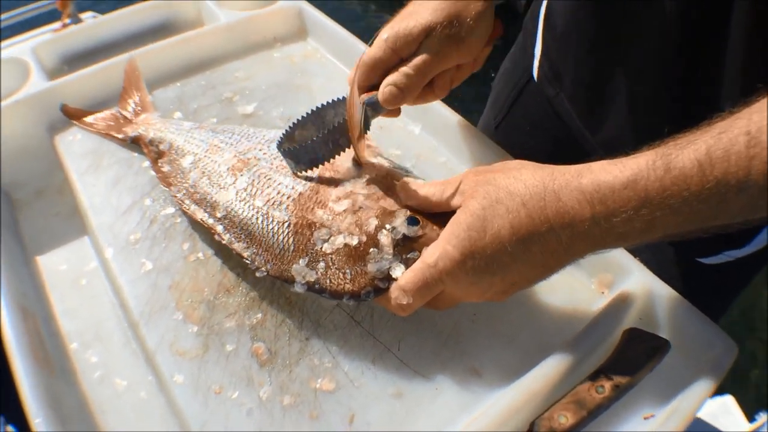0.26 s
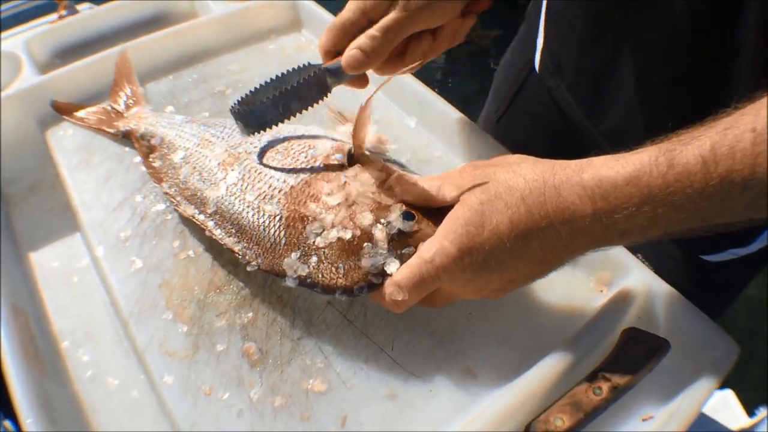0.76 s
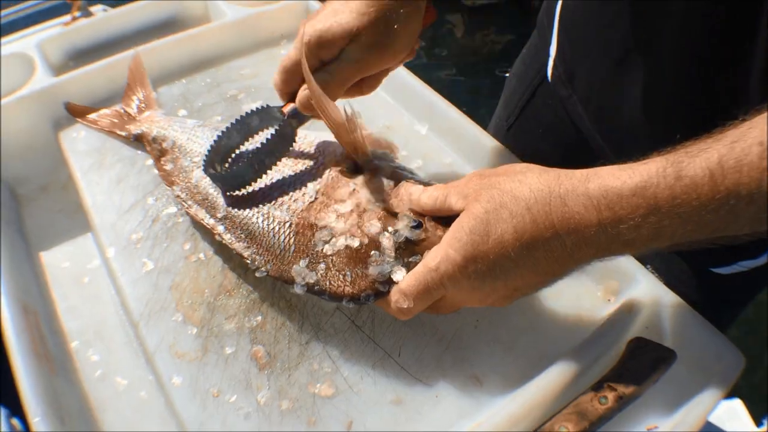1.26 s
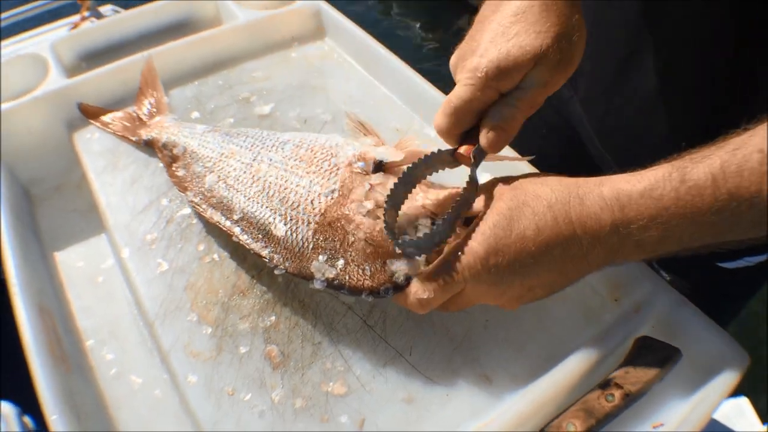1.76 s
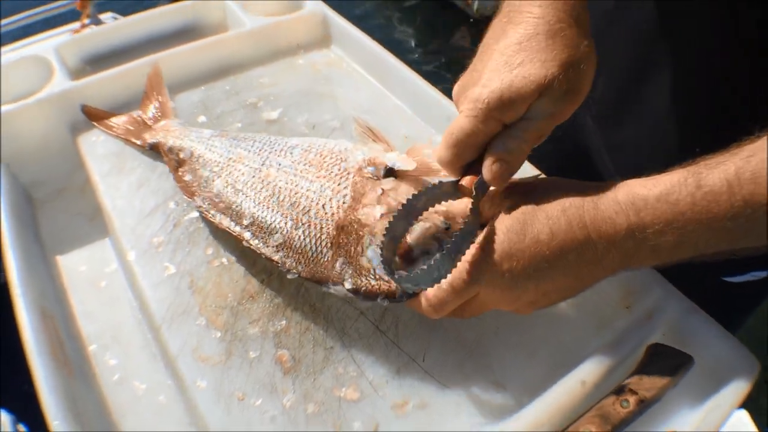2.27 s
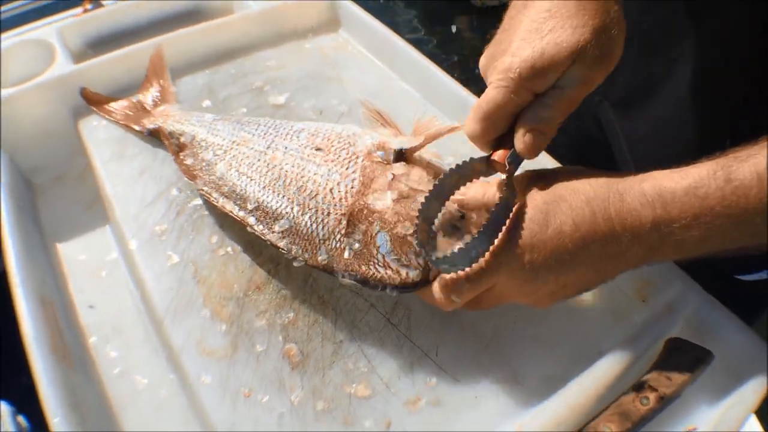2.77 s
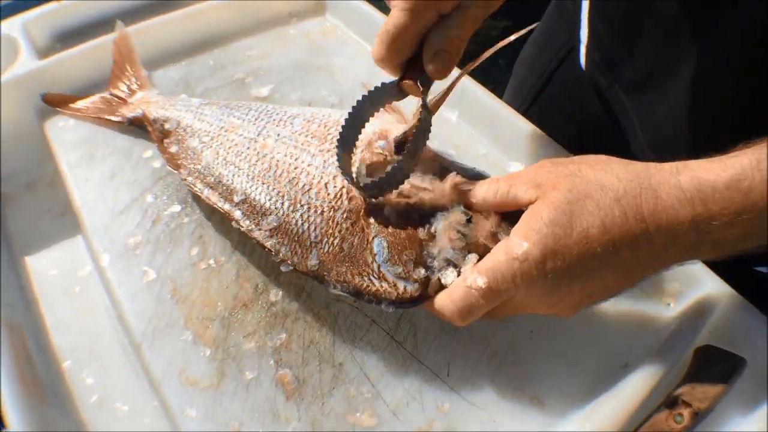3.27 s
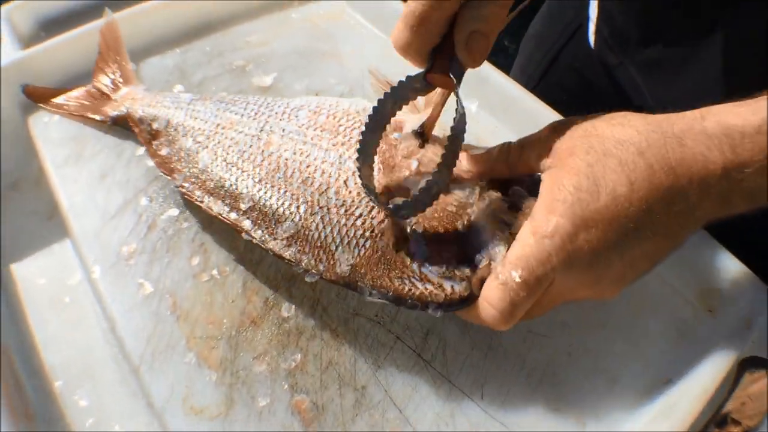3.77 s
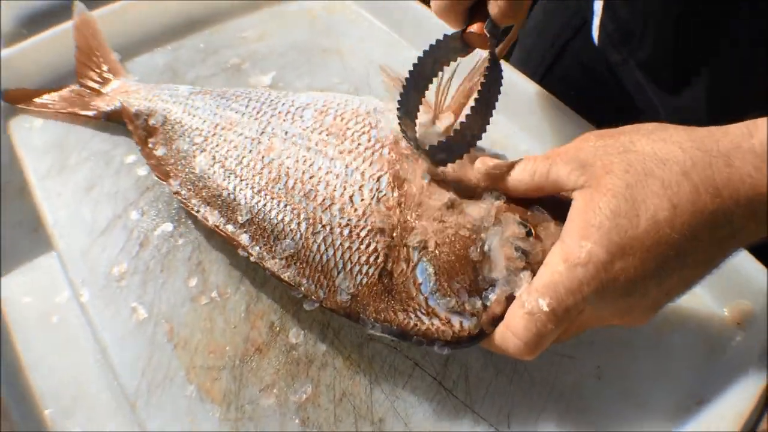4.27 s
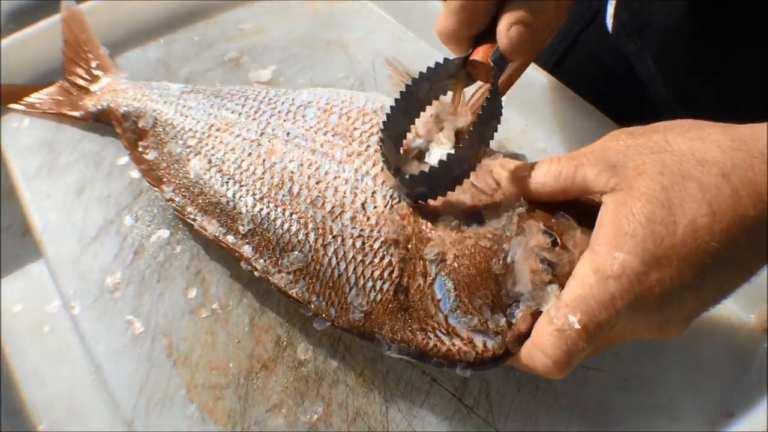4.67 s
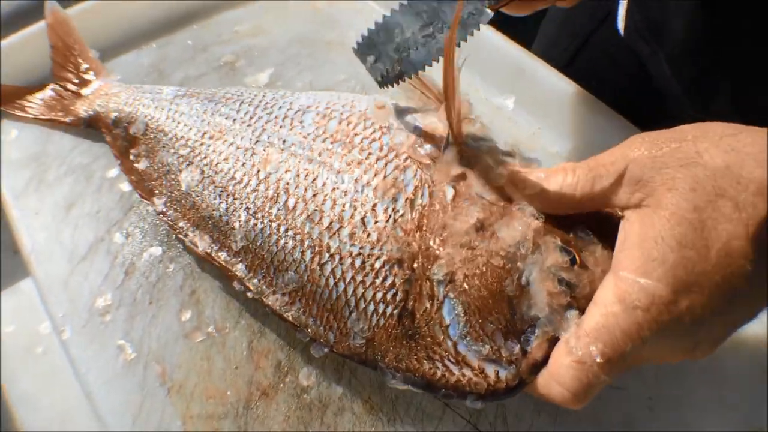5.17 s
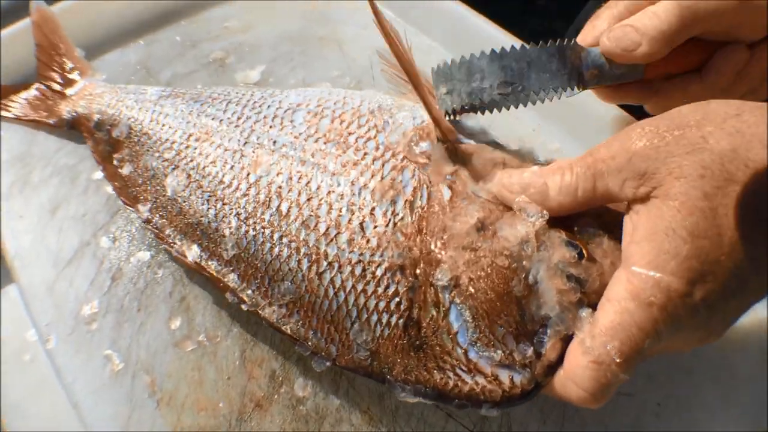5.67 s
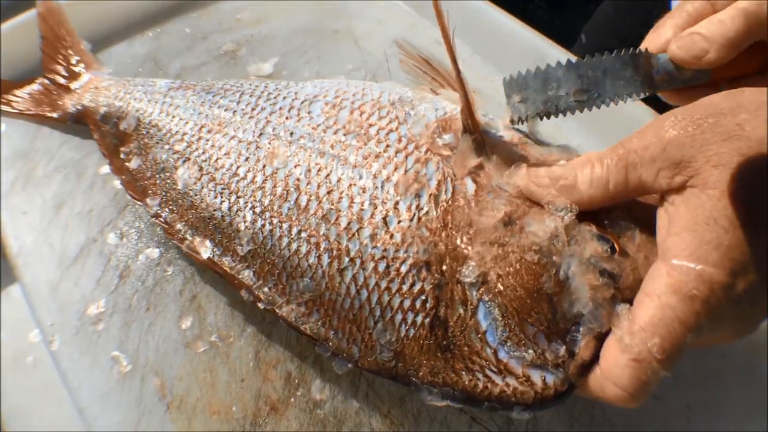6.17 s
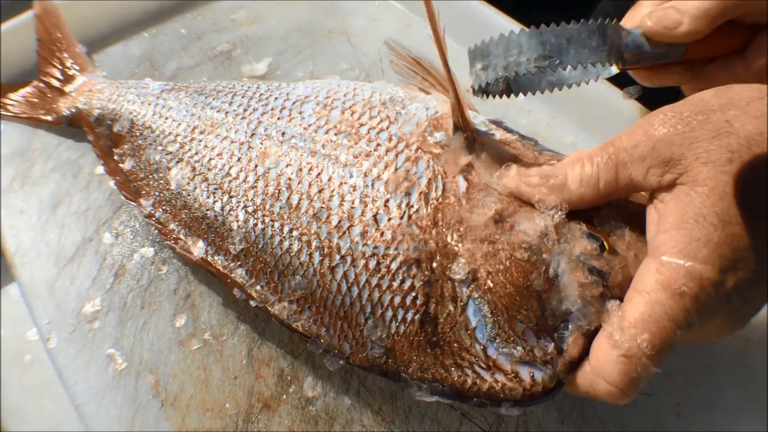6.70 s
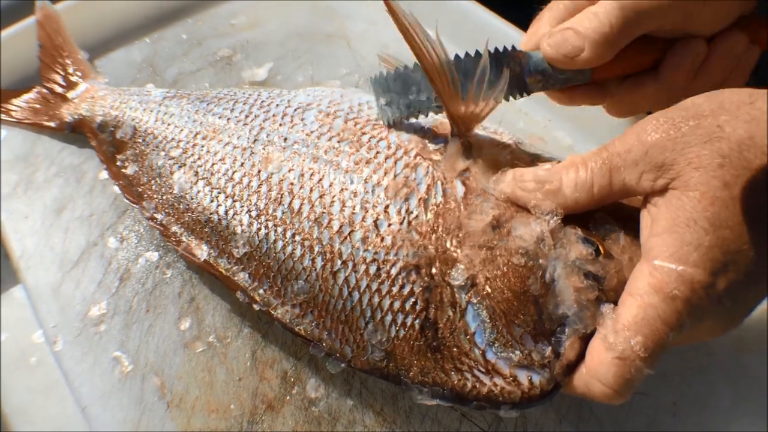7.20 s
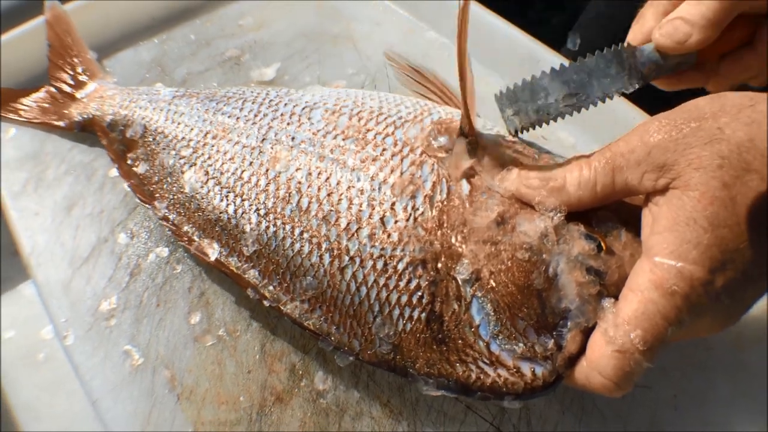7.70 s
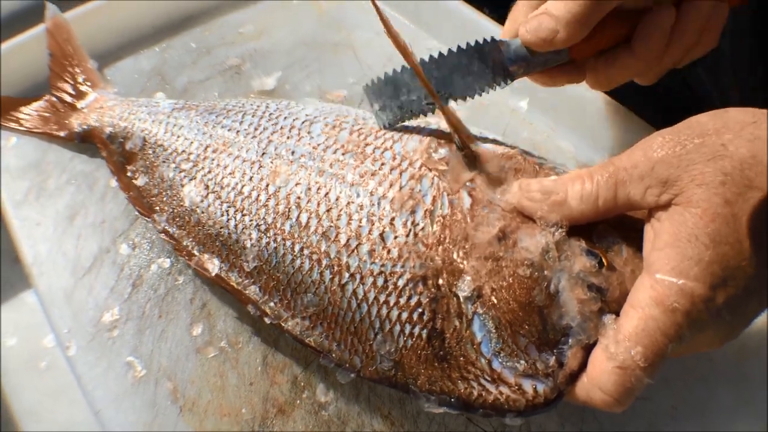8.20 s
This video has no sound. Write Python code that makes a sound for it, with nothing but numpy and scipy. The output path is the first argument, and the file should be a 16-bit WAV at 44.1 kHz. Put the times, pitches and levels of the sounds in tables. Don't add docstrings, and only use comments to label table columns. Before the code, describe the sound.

A close, dry outdoor sound of a fish being scaled with a toothed steel loop on a plastic tray. In the first second, separate short scrapes and sharp snaps fall near 0.1, 0.4, 0.6 and 1.0 s, with small tray knocks. From 1.4 to 3 s the strokes come steadily, about four a second, with strong bright cracks near 1.4, 2.0 and 2.5 s, a thin metallic hum on some strokes and tiny squeaks near 1.25 and 2.6 s. From 3.2 to 5.1 s the rasps are softer and grittier, scattered with pops and ticks. After a lighter gap, crisp crackling strokes resume at 5.5 s, roughly every 0.3 s, fullest around 5.8 to 6.4 s. From 7.2 s to the end at about 8.4 s, scrapes ring more hollow and the tray booms under heavier shoves. Faint, gently swelling open air continues throughout.

```python
import sys
import numpy as np
from scipy import signal
from scipy.fft import rfft, irfft
from scipy.io import wavfile
from scipy.ndimage import uniform_filter1d

SR = 44100
rng = np.random.default_rng(int(sys.argv[2]) if len(sys.argv) > 2 else 0)


def file_out(sig):
    cols = np.atleast_2d(sig).T
    lim = np.clip(cols, -1, 1)
    pcm = np.round(lim * 32767).astype(np.int16)
    wavfile.write(sys.argv[1], SR, pcm)


def natural_amplitude(level_db):
    exponent = np.asarray(level_db, float) / 20
    return 10 ** exponent


N = 372468

# frequency in Hz, width in Hz, level in dB.
STEEL_MODES = [(3300, 380, -5), (3600, 250, 3.5), (3980, 400, -4.5), (4700, 270, -13), (2870, 880, -7.5),
               (6040, 1400, -11.5)]
# frequency in Hz, level in dB.
SCALE_COLOUR = [(400, -9.5), (1500, -9.5), (4000, -5.5), (7000, -4), (11000, -3), (15000, -4.5)]


def evened(x):
    return x / np.sqrt(np.mean(x ** 2) + 1e-20)


def curves(rows):
    s, *columns = np.transpose(rows)
    return [np.interp(np.arange(N) / SR, s, column) for column in columns]


def coloured(x, points):
    hz, db = np.transpose(points)
    bins = np.log(np.fft.rfftfreq(N, 1 / SR) + 1)
    return irfft(rfft(x) * natural_amplitude(np.interp(bins, np.log(hz + 1), db)), N)


def mode(x, hz, width, db):
    r = np.exp(-np.pi * width / SR)
    angle = 2 * np.pi * hz / SR
    ringing = signal.lfilter([1], [1, -2 * r * np.cos(angle), r * r], x)
    return natural_amplitude(db) * 2 * (1 - r) * np.sin(angle) * ringing


def body(x, modes):
    power = sum(np.pi * width / SR * natural_amplitude(2 * db) for hz, width, db in modes)
    return sum((-1) ** k * mode(x, *row) for k, row in enumerate(modes)) / np.sqrt(power)


def puff(rise_s, fall_s):
    t = (np.arange(700) - 200) / SR
    rise = np.exp(np.minimum(t, 0) / rise_s)
    fall = np.exp(-np.maximum(t, 0) / fall_s)
    return np.where(t < 0, rise, fall)


def tearing(per_s, spread_db, fall_s, bed):
    sizes = natural_amplitude(spread_db * np.minimum(rng.exponential(1, N), 4))
    clicks = sizes * (rng.random(N) < per_s / SR)
    grains = signal.oaconvolve(clicks, puff(0.63 * fall_s, fall_s))[:N] * rng.standard_normal(N)
    rasp = evened(grains) + bed * rng.standard_normal(N)
    return rasp / np.sqrt(uniform_filter1d(rasp ** 2, 1500))


def blows(rows, length_s):
    s, peak_db = np.transpose(rows)
    clicks = np.zeros(N)
    clicks[(s * SR).astype(int)] = natural_amplitude(peak_db)
    return signal.oaconvolve(clicks, signal.windows.hann(int(length_s * SR)))[:N]


def shifting(x, patchy_db):
    z = signal.stft(x, nperseg=256)[2]
    patches = uniform_filter1d(rng.standard_normal(z.shape), size=6, axis=0)
    patches = uniform_filter1d(patches, size=16, axis=1)
    return signal.istft(z * natural_amplitude(patchy_db * evened(patches)), nperseg=256)[1][:N]


def air():
    # frequency in Hz, density in dB per Hz.
    air_colour = [(18, -16), (30, 19), (81, -7.5), (295, -0.5), (499, -7), (3580, -15.5), (5900, -25),
                  (16000, -33)]
    swell_db = 2.1 * evened(uniform_filter1d(rng.standard_normal(N), 4000))
    stir = tearing(per_s=92, spread_db=19.0, fall_s=0.001, bed=0.5)
    wide = evened(coloured(rng.standard_normal(N), air_colour))
    wide = wide + natural_amplitude(-15.0) * body(stir, STEEL_MODES)
    return natural_amplitude(-51 + swell_db) * shifting(wide, patchy_db=3.5)


def pressure():
    # time of the peak in seconds, level in dB.
    shove_peaks = [(0.0, -31), (.14, -49), (0.388, -33), (.63, -30), (1.026, -28.5), (1.427, -32.5),
                   (1.758, -46), (2.0, -32), (2.259, -28), (2.536, -29.5), (2.75, -35), (3.08, -45.5),
                   (3.311, -32.5), (3.69, -41), (3.95, -49), (4.23, -35.5), (4.47, -40), (4.752, -32),
                   (4.87, -38), (5.009, -35), (5.501, -37), (5.828, -38.5), (6.109, -32), (6.351, -31.5),
                   (6.627, -29), (6.931, -30), (7.265, -16.5), (7.651, -16.5), (8.005, -20.5), (8.287, -27)]
    rise_s, fall_s, rest_db = 0.13, 0.09, -62
    t = np.arange(0, N + 64, 64) / SR
    s, peak_db = np.transpose(shove_peaks)[:, :, None]
    away = np.where(t < s, (s - t) / rise_s, (t - s) / fall_s) ** 0.96
    load_db = (peak_db + (rest_db - peak_db) * np.minimum(away, 1)).max(0)
    return np.interp(np.arange(N) / SR, t, load_db)


def table():
    # frequency in Hz, width in Hz, level in dB.
    leg_modes = [(48, 5.4, -1), (80.5, 16.4, 5), (127.5, 77, -4)]
    # start in seconds, peak in dB.
    thumps = [(0.387, -37), (0.61, -38), (1.009, -24), (1.698, -24.5), (1.966, -29), (2.834, -32.5),
              (3.278, -34), (3.412, -27.5), (3.502, -36.5), (3.659, -29.5), (3.924, -32), (4.217, -33),
              (5.223, -35.5), (5.505, -28.5), (6.363, -23.5), (6.611, -20.5), (6.907, -27), (7.252, -42),
              (7.28, -26), (7.645, -25), (7.973, -26)]
    level_db = pressure()
    shaking = tearing(per_s=45, spread_db=5.5, fall_s=0.021, bed=0.28) * natural_amplitude(-20.0 + 0.5 * level_db)
    return body(shaking + natural_amplitude(-11.5) * blows(thumps, 0.0089), leg_modes)


def tray():
    # frequency in Hz, width in Hz, level in dB.
    tray_modes = [(262, 106, -5.5), (314.6, 51, 4.5), (404, 105, -7.5), (678, 118, -13.5)]
    # frequency in Hz, width in Hz, level in dB.
    belly = (186, 51, 0)
    # time in seconds, level in dB.
    weight = [(0, -24), (1.5, -8.5), (5.4, -12), (6, -3), (7.7, -1), (8.45, -5)]
    # start in seconds, peak in dB.
    knock_rows = [(0.009, -27), (0.124, -25), (0.339, -26), (0.392, -20.5), (0.573, -34), (0.619, -18),
                  (0.657, -33), (1.38, -32.5), (1.394, -29), (1.427, -24.0), (1.718, -30.5), (1.745, -29.5),
                  (1.76, -35), (2.0, -35), (2.228, -33.5), (2.259, -31), (2.342, -50), (2.526, -22.5),
                  (2.744, -34.5), (2.761, -29), (3.308, -28), (3.946, -36), (4.265, -30), (4.472, -32.5),
                  (4.757, -34), (4.788, -32.5), (4.974, -35), (5.0, -35), (5.037, -35), (5.448, -26),
                  (5.488, -28), (5.511, -25.5), (5.821, -29), (6.344, -31), (6.582, -34), (6.61, -28.5),
                  (6.643, -39), (6.893, -33), (7.253, -32), (7.272, -19.5), (7.478, -42), (7.643, -19.5),
                  (7.948, -31), (7.974, -26), (7.995, -19), (8.013, -17), (8.116, -38), (8.267, -27),
                  (8.288, -26), (8.329, -32), (8.344, -34.0)]
    # start in seconds, peak in dB.
    lone_knock = (4.3, -33.5)
    level_db = pressure()
    shoves = tearing(per_s=110, spread_db=2.5, fall_s=0.0022, bed=0.3) * natural_amplitude(level_db)
    weight_db, = curves(weight)
    knocks = blows(knock_rows + [lone_knock], 0.00085)
    boom = body(natural_amplitude(2.5) * shoves + natural_amplitude(4.5) * knocks, tray_modes) + natural_amplitude(-11.0) * knocks
    dull = body((shoves + natural_amplitude(-4.5) * knocks) * natural_amplitude(weight_db), [belly])
    return signal.lfilter(*signal.butter(2, 110., "high", fs=SR), boom + dull)


def squeaks():
    # start in seconds, length in seconds, pitch in Hz, level in dB.
    slips = [
        (1.249, 0.03, 920, -40.5),
        (2.622, 0.061, 514, -46),
        (6.196, .016, 980, -44),
    ]
    out = np.zeros(N)
    for s, length, hz, db in slips:
        t = np.arange(int(length * SR)) / SR
        drift, flutter = rng.standard_normal((2, len(t)))
        tone = np.sin(2 * np.pi * hz * t + np.cumsum(0.043 * drift))
        tone = tone * natural_amplitude(3.6 * evened(uniform_filter1d(flutter, 90)))
        out[int(s * SR):][:len(t)] += natural_amplitude(db) * tone * np.sin(np.pi * t / length)
    return out


def singing():
    # frequency in Hz, width in Hz, level in dB.
    free_mode = (2320, 210, 0)
    # start in seconds, length in seconds, level in dB.
    moments = [(.94, .13, -35), (1.32, .14, -33), (1.945, .09, -31), (2.21, .08, -26), (2.61, .035, -41),
               (2.73, .04, -28), (2.92, .025, -40), (3.205, .07, -34), (3.92, .035, -43)]
    free = np.zeros(N)
    for s, length, db in moments:
        part = free[int(s * SR):int((s + length) * SR)]
        part += natural_amplitude(db + np.linspace(-5.5, 0, len(part)))
    hum = mode(mode(rng.standard_normal(N), *free_mode), *free_mode)
    return evened(hum) * uniform_filter1d(free, 400)


def contact():
    # start in seconds, length in seconds, crackle in dB,
    # ring of the loop against the crackle in dB.
    strokes = [(0.0, 0.037, -41, -6.5), (0.333, 0.014, -23, -5), (0.625, 0.006, -27.5, 16),
               (1.012, 0.068, -30.5, -15), (1.405, 0.056, -26.5, -12), (1.74, 0.055, -26.5, -16.5),
               (1.97, 0.08, -28.5, -27), (2.219, 0.073, -30.5, 7.5), (2.496, 0.049, -29.5, 8),
               (2.716, 0.072, -28.5, 3.5), (2.961, 0.064, -36, 3), (3.247, 0.095, -32, -8),
               (3.615, 0.073, -35, -3.5), (3.921, 0.082, -31.5, -16), (4.184, 0.074, -30, -7.5),
               (4.442, 0.096, -35.5, -17), (4.715, 0.091, -41, -0.5), (4.947, 0.12, -42.5, -0.5),
               (5.486, 0.029, -25, -23), (5.804, 0.064, -28.5, -7), (6.063, 0.07, -23.5, -17),
               (6.339, 0.064, -28, -0.5), (6.601, 0.05, -31.5, 3), (6.869, 0.068, -31.5, -5),
               (7.25, 0.046, -29, 5.5), (7.617, 0.067, -31, 7), (7.948, 0.08, -32.5, 4.5),
               (8.232, 0.075, -39, 4), (8.322, 0.049, -39, 6.5)]
    # start in seconds, crackle in dB, ring in dB.
    bites = [(0.296, -42, 5), (0.548, -39, -7), (.953, -40.5, 5), (1.375, -33, -8), (1.706, -31.5, 2.5),
             (1.944, -38, 0), (2.192, -43, 4), (2.455, -27.5, -3.5), (2.681, -34.5, -6), (2.923, -39.5, -4),
             (3.206, -45, -5), (4.142, -45, 3), (5.443, -37.5, -4), (5.761, -46, -10), (6.029, -39, 4),
             (6.294, -36, -1.5), (6.556, -39, 0), (7.195, -37.5, 3.5), (7.568, -48.5, 11.5),
             (7.906, -43.5, 4.5)]
    # start in seconds, length in seconds, crackle in dB, ring in dB.
    brushes = [(0.093, 0.065, -52.5, 9), (0.343, 0.07, -41.5, -5), (0.916, 0.035, -55, 13),
               (1.3, 0.16, -52, 5), (1.473, 0.025, -42, -5), (1.802, 0.025, -38, 1),
               (2.066, 0.029, -41, -34), (2.586, 0.016, -34, 7), (2.617, 0.043, -46.5, -10),
               (3.029, 0.081, -49.5, 10), (3.497, 0.071, -44, -11.5), (3.58, 0.032, -54, 6),
               (3.714, 0.016, -38, -6), (3.749, 0.041, -43, -21), (4.015, 0.069, -51, 2),
               (4.085, 0.022, -66, 27), (4.287, 0.077, -51, 5), (4.554, 0.043, -45.5, 2),
               (4.819, 0.11, -57.5, 9), (5.316, 0.11, -49, 0.5), (5.516, 0.07, -35, -6),
               (5.601, 0.038, -46, 4), (5.93, 0.084, -59, 1), (6.775, 0.18, -54, 1),
               (6.938, 0.058, -41.5, 1), (7.08, 0.018, -42.5, 1.5), (7.109, 0.052, -48.5, -18),
               (7.297, 0.044, -42, 5), (7.848, 0.017, -52.5, 20), (8.095, 0.069, -45, -6),
               (8.165, 0.066, -59.5, 10.5)]
    # start in seconds, length in seconds, crackle in dB.
    grazes = [(0.805, 0.014, -50), (1.094, 0.067, -58), (1.541, 0.018, -46), (2.335, 0.011, -35.5),
              (2.786, 0.07, -50.5), (3.34, 0.1, -57.5), (4.379, 0.051, -57.5), (4.659, 0.036, -53),
              (5.065, 0.032, -48), (5.729, 0.029, -38), (5.91, 0.0068, -55), (6.164, 0.028, -53),
              (7.741, 0.012, -44), (5.876, 0.013, -47), (7.002, 0.032, -50), (7.394, 0.01, -51),
              (7.472, 0.055, -55.5), (7.697, 0.02, -46)]
    held = [(s, min(row[0] for row in strokes if row[0] > s) - s, db, ring_db) for s, db, ring_db in bites]
    grazed = [(*row, 0.5) for row in grazes]
    gain = np.zeros((3, N))
    for s, length, db, ring_db in strokes + brushes + held + grazed:
        levels_db = db + np.array([0, -2.5 + 0.51 * ring_db, ring_db])
        gain[:, int(max(s, 0) * SR):int((s + length) * SR)] += natural_amplitude(levels_db[:, None])
    return gain


def drags():
    # frequency in Hz, width in Hz, level in dB.
    hollow_modes = [(870, 310, -5), (1304, 320, -1), (1725, 640, -5.5), (2300, 410, -4.5)]
    # frequency in Hz, width in Hz, level in dB.
    narrow_modes = [(3620, 21, 7), (4610, 37, 4.5), (6390, 330, 2.5)]
    # time in seconds, steel level in dB, narrow level in dB.
    tilt = [(0, 6.5, -4), (1.1, 2, -4), (2.0, 3.5, -30), (2.25, -0.5, -25), (2.85, -2, -13), (3.1, 2, -1.5),
            (5.2, -2, -18), (6.3, -1, -13), (7.0, 1.2, -9), (8.45, 2.5, -3.5)]
    gain = contact()
    engage = int(0.025 * SR)
    judder = natural_amplitude(1.74 * evened(uniform_filter1d(rng.standard_normal(N), 400)))
    fade = np.exp(-1 / (0.05446 * SR))
    graze = natural_amplitude(-16.5) * signal.filtfilt([1 - fade], [1, -fade], gain)
    graze = graze * natural_amplitude(np.array([[-6.], [0.], [0.]]))
    grip = uniform_filter1d(np.sqrt(gain), engage, axis=1) ** 2
    crackle, high, low = (grip + graze) * judder
    fine = tearing(per_s=700, spread_db=4.0, fall_s=0.00017, bed=0.67)
    coarse = tearing(per_s=450, spread_db=1.0, fall_s=0.00029, bed=0.56)
    bumps = tearing(per_s=190, spread_db=0.0, fall_s=0.00089, bed=0.53)
    needles = rng.standard_normal(N) * (rng.random(N) < 160 / SR)
    grit = coloured(fine + natural_amplitude(-11.0) * evened(needles), SCALE_COLOUR)
    bright = natural_amplitude(2.5) * evened(grit) * crackle
    steel_db, narrow_db = curves(tilt)
    strike = (0.24 * fine + 0.7 * coarse) * high * natural_amplitude(steel_db)
    ring = natural_amplitude(4.0) * body(strike, STEEL_MODES) + body(strike * natural_amplitude(narrow_db), narrow_modes)
    drive = (0.46 * fine + 0.72 * bumps) * low
    return bright + ring + natural_amplitude(-0.5) * body(drive, hollow_modes)


def plain(rows):
    return [(s, db, db - 13, 3730) for s, db in rows]


def snaps(rows):
    cracks, rings = np.zeros((2, N + 700))
    noise = rng.standard_normal((len(rows), 2, 700))
    for (s, crack_db, ring_db, hz), (a, b) in zip(rows, noise):
        at = int(s * SR) - 200
        crack = puff(0.0015, 0.00076) * a + 2.1 * np.sign(a) * puff(0.00004, 0.00005)
        cracks[at:at + 700] += natural_amplitude(crack_db) * crack
        scale_modes = [(hz, 450, 0), (1.88 * hz, 1500, -8), (0.69 * hz, 800, -10)]
        rings[at:at + 700] += natural_amplitude(ring_db) * evened(body(puff(0.00087, 0.0011) * b, scale_modes))
    return natural_amplitude(2.0) * coloured(cracks[:N], SCALE_COLOUR) + natural_amplitude(-12.5) * rings[:N]


def scene():
    # time in seconds, crack in dB, ring in dB, ring in Hz.
    snap_rows = [(.1085, -22, -12, 1780), (.1244, -5, -12.5, 1300), (.3319, -40, -15, 3600),
                 (.3452, -26, -12, 3400), (.3928, -13.5, -7.5, 3060), (.6203, -14, -9, 3100),
                 (1.0203, -11, -14, 4170), (1.4282, -2.5, -10.5, 3330), (1.7457, -5.5, -15, 1290),
                 (1.9947, -0.5, -6.5, 1330), (2.2327, -17, -10, 3450), (2.4695, -13, -21, 3400),
                 (2.4957, -2.5, -38, 1420), (2.7302, -5, -20, 3800), (2.9883, -7, -10.5, 3730),
                 (3.0158, -28, -19, 4460), (3.7399, -12.5, -21, 4700), (4.0453, -22, -19.5, 3050),
                 (4.0608, -38, -18, 4400), (4.262, -18, -22, 1490), (4.4737, -15.5, -27.5, 1470),
                 (4.7502, -15, -18, 3120), (5.0011, -19.5, -26, 790), (5.0389, -13, -19.5, 3600),
                 (5.0535, -11, -24.5, 735), (5.5126, -3, -13, 3420), (5.8504, -10, -13, 3430),
                 (6.3749, -7.5, -14, 3400), (6.6236, -8.5, -16.5, 2880), (6.9705, -13, -23.5, 1280)]
    # time in seconds, crack in dB, ring in
    # dB, ring in # Hz.
    more_snaps = [(0.3972, -24, -38, 780.0), (0.6012, -25, -39, 4030.0), (0.6246, -20, -30, 3010.0),
                   (0.7755, -41, -41, 1310.0), (0.8183, -50, -44, 3620.0), (1.0477, -17, -31, 2330.0),
                   (1.055, -15.0, -24, 4740.0), (1.2944, -37, -34.5, 4340), (1.3944, -22, -26, 3680.0),
                   (1.444, -26, -39, 3750.0), (1.449, -21, -26, 2300.0), (1.7084, -29, -24, 3860),
                   (1.802, -22, -23, 4330.0), (1.8136, -23, -27, 1460.0), (1.984, -19, -22, 3360.0),
                   (2.284, -32, -17, 1290.0), (2.427, -48, -40, 1800), (2.696, -24, -22.5, 2280.0),
                   (2.7205, -19, -17, 3790.0), (2.992, -16, -23, 2340), (3.0119, -20, -20, 3940),
                   (3.0276, -40, -28, 4570.0), (3.218, -31.0, -27.5, 3720), (3.2567, -21, -29, 4070.0),
                   (3.303, -20.5, -23, 4650.0), (3.3806, -44, -55, 2760.0), (3.608, -30, -46, 3530.0),
                   (3.686, -37, -25, 3810.0), (3.7991, -42, -41, 3950), (3.8082, -38, -42, 4460.0),
                   (3.933, -43, -24, 4000), (3.973, -15, -24, 4240.0), (4.3318, -29, -34.5, 1820),
                   (4.5259, -33, -28, 3660), (4.6792, -39, -49, 1490.0), (4.7163, -45, -34.0, 3640.0),
                   (4.7708, -24, -34, 1530.0), (4.787, -44, -28, 3360), (4.7917, -37, -36, 3620.0),
                   (4.8483, -34, -43, 730.0), (4.8678, -32, -31.5, 3450), (5.0214, -36, -35, 730.0),
                  (5.2678, -41.5, -58, 1510.0), (5.349, -29.5, -38, 3290.0), (5.374, -31, -38, 3570.0),
                  (5.4034, -25, -31, 706), (5.4532, -22, -36, 710.0), (5.4796, -29, -24, 4540.0),
                  (5.4897, -17, -27, 2220.0), (5.8131, -8, -21, 3250), (5.916, -32.5, -37, 3620.0),
                  (5.9981, -41, -55, 1360.0), (6.0565, -24, -21, 4170), (6.0878, -14, -23, 3190.0),
                  (6.1088, -12, -18, 3360), (6.2685, -46, -39, 4200), (6.3182, -26, -32, 2360),
                  (6.359, -16, -24, 3400.0), (6.396, -18, -29, 4700), (6.56, -43, -30, 1050),
                  (6.613, -16, -22.5, 1530.0), (6.7257, -44, -43, 3340.0), (6.8902, -13, -25, 3470),
                  (6.9087, -16, -23, 4170), (6.9652, -27, -21.5, 1280), (6.995, -47, -27.5, 1010.0),
                  (7.055, -41, -45.0, 3730.0), (7.078, -44.0, -41, 1400.0), (7.0905, -35, -29, 3600.0),
                  (7.2743, -27, -15, 750.0), (7.3203, -29, -37, 3620.0), (7.3287, -31, -27.5, 1980.0),
                  (7.4042, -37, -44, 3360.0), (7.656, -26, -21, 1100), (7.7127, -49, -32.5, 1180.0),
                  (7.748, -56, -43, 1230.0), (8.2095, -48, -43, 3620.0), (8.291, -21.5, -32.0, 2580.0),
                  (8.33, -34, -23.5, 3500), (8.3457, -35, -26, 4670.0)]
    # time in seconds, crack in dB.
    dry_cracks = [(.5708, -20.5), (.6567, -27), (0.97, -18.5), (.9743, -15), (1.0855, -16), (1.495, -17),
                  (1.5328, -34), (1.549, -29), (2.023, -9.5), (2.0476, -10.5), (2.083, -36), (2.5478, -11),
                  (2.7956, -8.5), (2.9704, -8.5), (3.0858, -15), (3.5224, -35), (3.6541, -12.5),
                  (3.732, -18), (3.9629, -19), (3.989, -16), (4.0, -26), (4.07, -25.5), (4.143, -30),
                  (4.211, -21), (4.2394, -16), (4.2697, -9.5), (4.357, -24), (4.436, -29), (4.513, -19.5),
                  (4.9733, -19.5), (5.0095, -16), (5.4586, -17.5), (5.5642, -24), (5.5728, -21),
                  (5.584, -28), (5.612, -25), (5.783, -22), (5.8212, -4.5), (5.8724, -22.5), (6.0753, -19),
                  (6.1314, -9.5), (6.1464, -14.5), (6.381, -4), (6.4349, -38), (6.8778, -17), (8.03, -22),
                  (8.0406, -11)]
    # time in seconds, ring in dB, ring in Hz.
    tick_rows = [(0.6827, -37.5, 3078), (0.728, -36, 1290), (1.15, -45, 2400), (2.59, -36, 1016),
                 (3.7793, -26.5, 2560), (3.9074, -39, 3751), (4.126, -29.5, 3100), (4.5784, -29, 3300),
                 (4.59, -39, 3288), (4.879, -30, 1553), (4.8944, -32, 814), (6.202, -44, 950),
                 (5.433, -30, 3800), (5.617, -29, 1106), (5.648, -35, 2940), (5.7933, -24, 3336),
                 (5.9546, -34, 1120), (6.699, -38, 2320), (6.764, -36, 2241), (6.7756, -21.5, 3150),
                 (7.0235, -27, 3070), (7.0503, -37, 3368), (7.0845, -22.5, 3070), (7.353, -28, 1100),
                 (7.552, -39.5, 3900), (7.7987, -37.5, 1950), (8.0763, -36, 1141), (8.0892, -26, 2109),
                 (8.1148, -25, 3300), (8.13, -25.5, 3500)]
    # time in seconds, crack in dB.
    more_cracks = [(.038, -31), (.0515, -47), (.0809, -40), (.4308, -42), (.5227, -43), (.541, -34),
                   (.7654, -48), (1.1745, -42), (2.2389, -9.5), (2.9038, -39), (3.4345, -41), (3.546, -30),
                   (3.9835, -19), (4.3806, -39), (4.5414, -33), (5.123, -44), (5.7153, -36), (5.8044, -25),
                   (6.4717, -39), (6.987, -23), (7.1077, -35), (7.3692, -43)]
    ticks = [(s, db - 7, db, hz) for s, db, hz in tick_rows]
    torn = snaps(snap_rows + more_snaps + plain(dry_cracks) + ticks)
    near = shifting(drags(), patchy_db=2.5) + torn + squeaks()
    near = near + singing() + snaps(plain(more_cracks))
    t = np.arange(3000) / SR
    walls = rng.standard_normal(len(t)) * natural_amplitude(-60 * t / 0.017)
    walls = walls * (rng.random(len(t)) < 0.1) * (t > 0.001)
    wet = signal.oaconvolve(near, uniform_filter1d(walls / np.linalg.norm(walls), size=4))[:N]
    around = tray() + table() + air()
    return (near + natural_amplitude(-8.0) * wet + around)[None]


def roll_off(x):
    return signal.sosfilt(signal.butter(12, 16500, fs=SR, output="sos"), x)


def record(dry):
    edge = signal.firwin(191, 15380, window=("kaiser", 7), fs=SR)
    ceiling = 0.46
    rumble_cut = signal.lfilter(*signal.butter(2, 35., "high", fs=SR), dry)
    wide = signal.oaconvolve(rumble_cut, edge[None], "same") / ceiling
    limited = ceiling * wide / (1 + wide ** 4) ** 0.25
    return roll_off(signal.oaconvolve(limited, edge[None], "same"))


dry = scene()
out = record(dry)
file_out(out)
```